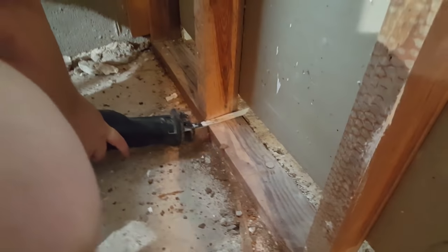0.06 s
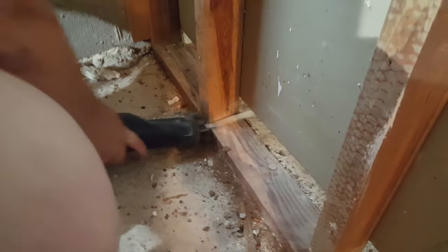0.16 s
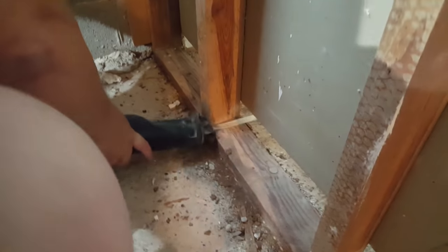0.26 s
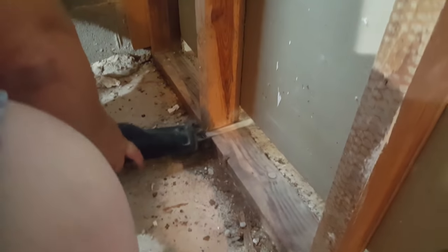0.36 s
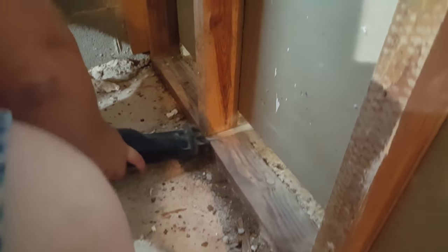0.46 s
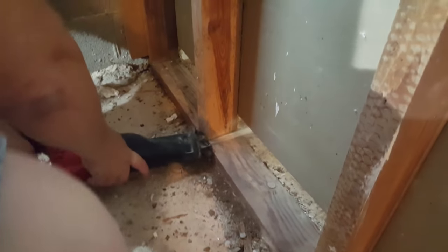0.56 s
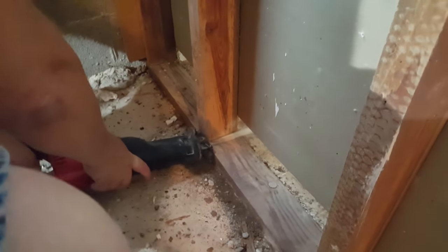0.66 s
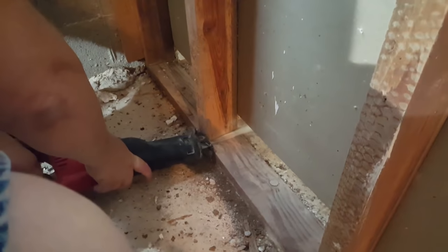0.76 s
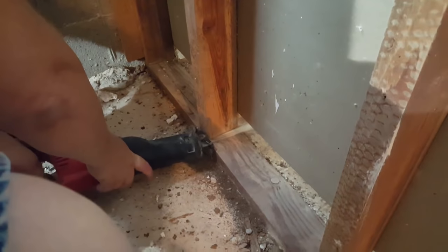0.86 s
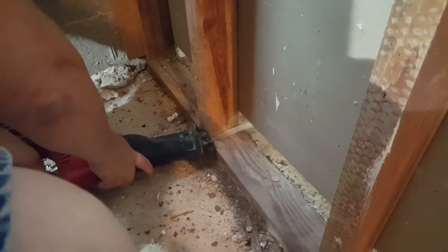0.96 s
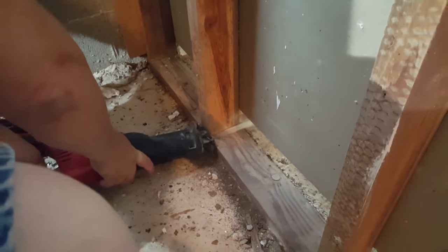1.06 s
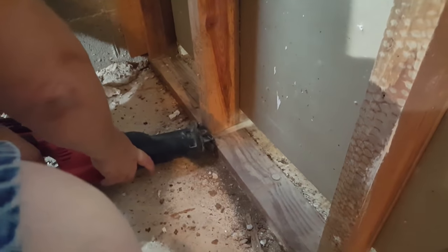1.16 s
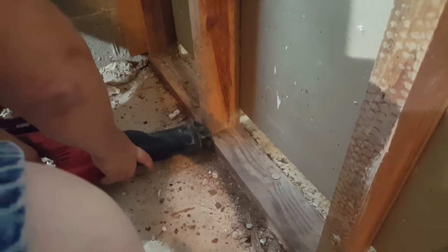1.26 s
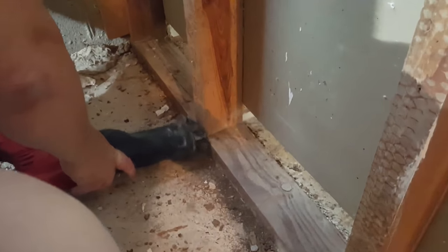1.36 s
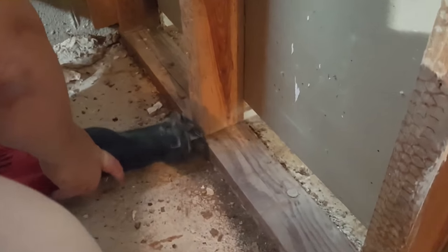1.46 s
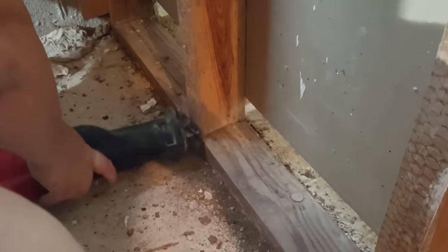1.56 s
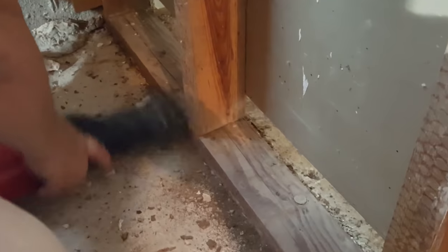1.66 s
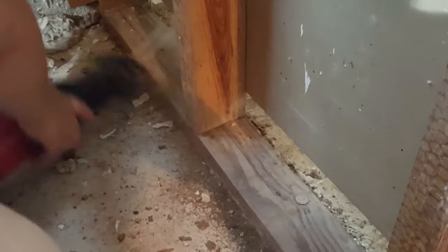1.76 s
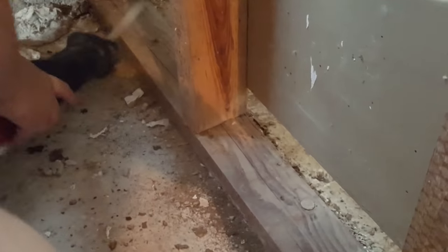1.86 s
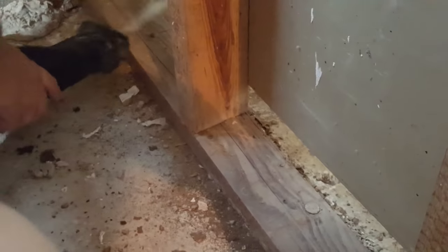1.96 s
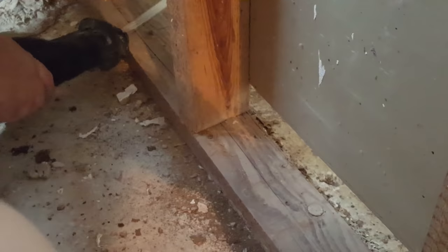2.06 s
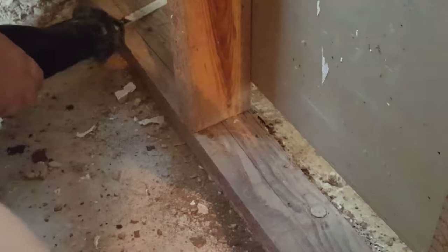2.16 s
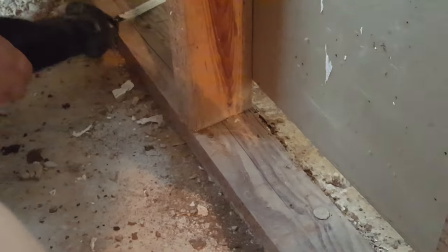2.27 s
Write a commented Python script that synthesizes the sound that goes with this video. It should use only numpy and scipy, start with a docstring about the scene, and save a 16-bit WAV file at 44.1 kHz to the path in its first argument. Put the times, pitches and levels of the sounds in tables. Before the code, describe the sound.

A reciprocating saw, close in a small bare room. Low handling rumble, a trigger snap at 0.08 seconds, then a short squeal as the motor starts near 0.2. A thumping kick at 0.29 opens a harsh rasp through nails, about 46 strokes a second, with cracks, wood shudder and singing chatter. At 1.84 the blade clinks free, whirs until 2.1, then brakes amid faint ticks.

```python
"""A low rumble of the tool being handled comes first, its trigger catch snaps, and squeals of filtered noise
lead the reciprocating saw up to about 46 strokes a second: gears and fan hiss through housing resonances.
For a second and a half the blade cuts nails: rasping tooth clicks, a slap a stroke, cracks, singing chatter
and thumps, while stroke harmonics shake the timber. It clinks free, runs on and is braked.
A small bare room answers throughout with a decaying noise tail."""
import sys
import numpy as np
from scipy import signal
from scipy.fft import rfft, irfft
from scipy.io import wavfile

SR = 44100
rng = np.random.default_rng(int(sys.argv[2]) if len(sys.argv) > 2 else 0)


def volts(x):
    """Linear amplitude factor 10**(x/20) for a level x in dB, scalar or array-like."""
    e = np.asarray(x, float) / 20
    return 10 ** e


def digitize_waveform(pressure):
    """Quantize a signal to 16-bit integers and store it at the path in sys.argv[1].

    Rows of a 2-D input are taken as channels; values are limited to [-1, 1].
    """
    field = np.atleast_2d(pressure).T
    bounded = np.clip(field, -1, 1)
    quanta = np.round(bounded * 32767).astype(np.int16)
    wavfile.write(sys.argv[1], SR, quanta)


N = 103635

# pace of the blade: (time [s], strokes per second [1/s])
STROKE_RATE = [(.2, 40), (.32, 45.5), (.45, 46.5), (1.3, 46.5), (1.5, 44.4), (1.75, 44.3), (1.95, 46.5),
               (2.35, 46.5)]
# the cut: (time [s], rasp [dB], slap depth [dB], odd strokes' extra slap [dB], share alike on every stroke [0-1])
CUT_COURSE = [(.2, -50, 6, 9, .1), (.25, -33.5, -6, 18, 0.4), (.29, -14, -5, -5, 0.37),
              (.33, -25.5, 6, 9.5, 0), (.42, -20.5, 10.5, 0, 0), (.6, -21.5, 6.5, 6.5, 0.06),
              (.75, -21.5, 9, 1.5, 0.01), (1.0, -23, 12.5, -1.5, .4), (1.25, -22, 13, -1.5, 0.25),
              (1.33, -26, 8, 3, 0.22), (1.5, -26, 8, 3, .25), (1.6, -22.5, 3, 3.5, 0.33),
              (1.7, -22.5, 0, 0, 0.06), (1.8, -30, 3, 3, 0.02), (1.84, -33, 1, 0, 0)]
# tone of the rasp: (frequency [Hz], relative density [dB per Hz])
CUT_TONE = [(35, -12), (60, -10.5), (180, -6), (308, -5.5), (458, -8), (553, -6.5), (636, -3.5), (698, -4),
            (1340, -4), (1860, -3), (2710, -21.5), (4120, -14.5), (10000, -34.5), (14900, -35),
            (16000, -92)]
# resonances of stud and blade: (frequency [Hz], width [Hz], relative level [dB])
STUD_MODES = [(638, 37, 0.5), (740, 34, 0.5), (945, 100, -1), (1032, 157, -2), (1248, 250, -3.5),
              (1438, 76, 1), (1583, 30, 0), (1820, 135, -9.5), (2087, 180, -1.5)]
# blade binds and chatters: (start [s], relative level [dB], length [s], start pitch [Hz], end pitch [Hz])
CHATTER_RUNS = [(.283, -13.5, .02, 1000, 854), (.358, -6.5, 0.014, 725, 687), (.405, -20, 0.011, 950, 1100),
                (.43, -13.5, 0.018, 757, 716), (.436, -16, 0.017, 1250, 1500),
                (.468, -12.5, .012, 1910, 1880), (.512, -19, 0.021, 1920, 1860),
                (.556, -13, .014, 980, 870), (.688, -11.5, .016, 1293, 1386), (.71, -10, 0.0082, 620, 620),
                (.728, -16, 0.023, 1653, 1600), (.795, -20, 0.015, 643, 790), (.925, -23, 0.011, 794, 930),
                (1.033, -18, .016, 745, 740), (1.068, -17, 0.024, 1394, 1700),
                (1.097, -13.5, 0.025, 734, 700), (1.203, -11, 0.023, 637, 620),
                (1.318, -10, .038, 1226, 1157), (1.33, -16.5, 0.044, 1615, 1810),
                (1.37, -11, 0.0258, 790, 1058), (1.417, -8.5, 0.02, 840, 1020),
                (1.461, -10, 0.031, 840, 990), (1.506, -12.5, .028, 1208, 1260),
                (1.508, -14, 0.019, 914, 930), (1.549, -12, 0.0456, 787, 657),
                (1.56, -19.5, 0.04, 1006, 1020), (1.596, -20, .025, 954, 900),
                (1.645, -18, 0.031, 1660, 1640), (1.69, -22.5, 0.02, 1740, 1710)]
# hardest blows of the blade on nail and wood: (time [s], relative peak [dB])
BLOW_HITS = [(0.288, -7.5), (0.4044, -20), (0.4262, -9), (0.4479, -18), (0.472, -15), (0.493, -12),
             (0.5147, -5.5), (0.557, -12.5), (0.5824, -12.5), (0.6399, -12.5), (0.6843, -12.5),
             (0.856, -12.5), (0.985, -11.5), (1.072, -13), (1.351, -9.5), (1.3915, -10), (1.553, -11.5),
             (1.598, -10.5), (1.8403, -12)]
# tone of the blows: (frequency [Hz], relative density [dB per Hz])
BLOW_TONE = [(180, -51), (300, -16), (1150, -15), (2650, -11), (4090, -13), (10200, -27.5), (13500, -49),
             (16000, -45)]
# tool kicks against the timber: (time [s], level [dB], frequency [Hz], t60 [s])
KICK_HITS = [(.286, -13, 240, .18), (.295, -10, 390, .12), (.29, -10, 170, .25), (.337, -9, 160, .11),
             (1.757, -13, 185, .08), (1.8389, -6, 850, .02)]
# timber shaken by the strokes: (time [s], level [dB])
SHAKE_LEVEL = [(.22, -74), (.32, -22), (.5, -30.5), (.7, -21), (1.0, -17.5), (1.25, -23), (1.4, -34),
               (1.6, -39), (1.78, -25), (1.86, -49), (2.1, -70)]
# harmonics of that shaking: (multiple of the stroke rate [1], relative level [dB])
SHAKE_HARMONICS = [(1, -5), (2, -5), (3, -6), (4, 0), (5, -4), (6, -4), (7, -10), (8, -7), (9, -2),
                   (10, -2), (11, -4), (12, -12), (13, -8), (14, -6), (15, -12), (16, -4)]
# running noise of gears and fan: (time [s], relative level [dB])
MOTOR_LEVEL = [(0, -50.5), (.19, -83), (.235, -26), (.26, -24), (.3, -23), (1.0, -23), (1.7, -26),
               (1.9, -24), (2.095, -25), (2.13, -35), (2.2, -52), (2.35, -60)]
# tone of gears and fan: (frequency [Hz], relative density [dB per Hz])
MOTOR_TONE = [(35, -72), (60, -43), (108, -32), (153, -18), (262, -9.5), (315, -10), (354, -5), (924, 1),
              (2900, -10.5), (4120, -7.5), (4640, -14.5), (8320, -16.5), (10300, -36), (12700, -25),
              (16000, -37)]
# housing resonances: (frequency [Hz], width [Hz], relative level [dB])
HOUSING_MODES = [(1020, 60, -14), (1375, 90, 13), (1790, 110, 28), (2540, 24, -50.5), (3030, 120, 16),
                 (4030, 290, 15), (4950, 38, -65)]
# squeals while the motor starts: (start [s], length [s], frequency [Hz], filter width [Hz], level [dB])
START_SQUEALS = [(0.118, .14, 7800, 9, -43), (.21, 0.091, 6100, 1300, -28), (0.251, 0.025, 1262, 110, -13)]
# rings after the trigger catch snaps: (frequency [Hz], level [dB], t60 [s])
TRIGGER_MODES = [(915, -29, 0.17), (1713, -33.5, 0.1), (540, -32, .06), (4950, -32.5, 0.044)]
# ticks of the tool and loose bits: (time [s], level [dB], t60 [s], treble over level [dB])
TICK_HITS = [(0.0814, -27.5, 0.11, -30), (0.111, -44, 0.054, -32), (.147, -41.5, .05, -3.5),
             (0.187, -34.5, 0.082, -18), (1.838, -22.5, 0.053, -3), (1.8548, -19, 0.035, -13),
             (1.91, -35, 0.035, 3), (2.09, -33.5, 0.051, 3.5), (2.204, -53, .04, -6), (2.243, -51, .04, -6),
             (2.287, -40, 0.031, -15)]
# tone of the duller part of the ticks: (frequency [Hz], relative density [dB per Hz])
TICK_TONE = [(180, -29), (300, -10), (701, -4.5), (946, -4), (3350, -21), (3700, -19), (4830, -18.5),
             (6100, -18.5), (8360, -24), (9390, -53), (10200, -45), (12300, -26), (16000, -117)]
# ringing of the freed blade: (frequency [Hz], relative level [dB], t60 before a cap [s])
BLADE_MODES = [(1870, 1, 0.11), (3130, -2, 0.21), (4250, 5.5, 0.02), (7830, 0.5, 0.071)]
# irregular thudding through floor and wall: (time [s], level before lumps [dB])
THUD_LEVEL = [(.2, -47), (.25, -27), (.3, -12.5), (.4, -21.5), (.52, -22.5), (.7, -25), (1.0, -53),
              (1.3, -24), (1.55, -24.5), (1.63, -22), (1.68, -22), (1.77, -28.5), (1.81, -34),
              (1.86, -29.5), (2.0, -44), (2.2, -43.5)]
# tone of the thudding: (frequency [Hz], relative density [dB per Hz])
THUD_TONE = [(15, -30), (25, -16.5), (102, 2), (172, 5), (216, 1.5), (270, -2.5), (479, -9), (600, -6),
             (780, -20.5), (1320, -120)]
# low rumble of the tool being handled before it starts, and of the room afterwards: (time [s], level [dB])
RUMBLE_LEVEL = [(0, -32.5), (.06, -32.5), (.13, -32.5), (.19, -34.5), (.3, -36), (2.0, -47), (2.2, -41),
                (2.35, -67)]
# tone of the rumble: (frequency [Hz], relative density [dB per Hz])
RUMBLE_TONE = [(15, -31), (35, -22), (86, -0.5), (129, 0.5), (205, -9.5), (248, -8), (277, -30), (500, -46),
               (650, -73), (1100, -120)]
# tone of the steady background hiss: (frequency [Hz], relative density [dB per Hz])
FLOOR_TONE = [(210, -41), (350, -4), (467, -12), (1260, -14), (2130, -19.5), (2710, -28), (3920, -28),
              (16000, -52)]
# stereo width of the coloured noises: (frequency [Hz], side minus mid [dB])
SIDE_WIDTH = [(60, -28), (150, -24.5), (380, -7), (950, -5), (2380, 0.5), (5980, -1), (15000, 1)]
# stereo placing: (time [s], left minus right [dB])
PAN_COURSE = [(0, 2), (.3, 1), (.5, 2), (1.0, 0.6), (1.6, 1), (2.35, 1)]
# difference between the microphones: (frequency [Hz], left minus right [dB])
MIC_BALANCE = [(60, 0.0), (150, -1.5), (380, -2), (950, -0.5), (2380, 0), (5980, -2), (15000, -4.5)]


def rms_one(x):
    """Scales a signal to rms 1."""
    return x / np.sqrt(np.mean(x ** 2) + 1e-20)


def in_time(rows):
    """Draws each table column as a curve in time."""
    s, *columns = np.transpose(rows)
    return [np.interp(np.arange(N) / SR, s, column) for column in columns]


def at_hz(points, hz):
    """Reads a spectrum table on a logarithmic frequency axis."""
    table_hz, table_db = np.array(points).T
    return np.interp(np.log(hz), np.log(table_hz), table_db)


def drift(rate_hz):
    """Slow random wander of rms about 1: noise through two equal low-pass poles."""
    every = 40  # samples between computed points
    r = np.exp(-2 * np.pi * rate_hz * every / SR)
    noise = rng.standard_normal(N // every + 2002)
    slow = signal.lfilter([1], [1, -2 * r, r * r], noise)[2000:]  # without the settling
    return np.interp(np.arange(N) / every, np.arange(len(slow)), rms_one(slow))


def colour(x, spectrum):
    """Minimum-phase filter for mid and side, of unit noise gain in mid; nothing sounds early."""
    hz = np.maximum(np.arange(4097) * SR / 8192, 10)
    db = at_hz(spectrum, hz) + np.array([0 * hz, at_hz(SIDE_WIDTH, hz)])
    # folding the cepstrum forward gives the minimum phase
    cepstrum = irfft(db * np.log(10) / 20)
    cepstrum[:, 1:4096] *= 2
    cepstrum[:, 4097:] = 0
    taps = irfft(np.exp(rfft(cepstrum)))
    return signal.fftconvolve(x, taps / np.sqrt(np.sum(taps[0] ** 2)), axes=1)[:, :N]


def resonate(x, hz, width_hz):
    """One two-pole resonance."""
    r = np.exp(-np.pi * width_hz / SR)
    feedback = [1, -2 * r * np.cos(2 * np.pi * hz / SR), r * r]
    return signal.lfilter([(1 - r * r) / 2, 0, (r * r - 1) / 2], feedback, x)


def bursts(rows):
    """Envelope of sudden bursts (time [s], level [dB], t60 [s]), each cut off once it has fallen 60 dB."""
    out = np.zeros(N)
    for s, db, t60 in rows:
        part = out[int(s * SR):int((s + t60) * SR)]
        part += volts(db - 60 * np.arange(len(part)) / SR / t60)
    return out


def grains(per_s, spread_db, size):
    """Random clicks of uneven size, signs unrelated in mid and side; rms 1."""
    struck = rng.random(size) < per_s / SR
    sizes = volts(spread_db * np.minimum(rng.exponential(1, size), 3)) * struck
    return rms_one(sizes) * rng.choice([-1, 1], (2, size))


def stud(x, weights):
    """Stud and blade resonances, each fed with its own weight in time and scaled for noise gain."""
    unit = np.sqrt(sum(volts(2 * db) * width for _, width, db in STUD_MODES) * np.pi / SR)
    out = 0
    for k, (hz, width, db) in enumerate(STUD_MODES):
        fed = x * weights(hz) + 1e-18  # never quite zero
        out = out + volts(db) * (-1) ** k * resonate(fed, hz, width)
    return out / unit * [[1], [.7]]


def strokes():
    """Running count of blade strokes, the sum of the stroke rate; zero at a slap."""
    slap_at_s = .4479
    turns = np.cumsum(in_time(STROKE_RATE)[0]) / SR
    return turns - turns[int(slap_at_s * SR)]


def cut(turns):
    """Dense tooth strikes, partly alike on every stroke, swelling at each end of the stroke."""
    teeth_per_s, tooth_spread_db = 3500, 3.5
    slap_decay_s, stroke_spread_db = .005, 2.5
    return_share, return_turn = .46, .45  # weaker slap as the blade turns back
    end_s = .033  # time constant of the dying cut
    stud_db, stud_shift_db = -9, 4.0  # the balance of the resonances shifts as the grip changes
    rasp_db, slap_db, alternate_db, repeat = in_time(CUT_COURSE)
    repeat = np.clip(repeat, 0, 1)
    t = np.arange(N) / SR
    on = (t > CUT_COURSE[0][0]) * np.exp(-np.maximum(t - CUT_COURSE[-1][0], 0) / end_s)

    decay = slap_decay_s * in_time(STROKE_RATE)[0]  # in strokes
    slap = np.exp(-(turns % 1) / decay)
    slap = slap + return_share * np.exp(-((turns - return_turn) % 1) / decay)
    which = np.floor(turns).astype(int)
    uneven = stroke_spread_db * np.clip(rng.standard_normal(200), -1.5, 1.5)[which + 50]
    uneven = uneven + alternate_db * np.where(which % 2 == 0, -1, 1)

    one_stroke = grains(teeth_per_s, tooth_spread_db, size=948)
    looped = one_stroke[:, (turns % 1 * 948).astype(int)]
    fresh = grains(teeth_per_s, tooth_spread_db, size=N)
    teeth = np.sqrt(1 - repeat) * fresh + np.sqrt(repeat) * looped
    teeth = teeth * on * volts(rasp_db + slap * (slap_db + uneven))
    ringing = stud(teeth, lambda hz: volts(stud_shift_db * drift(7.8)))
    return colour(teeth, CUT_TONE) + volts(stud_db) * ringing


def chatter():
    """The blade binds: runs of knocks excite the stud, and each run sings at a sliding pitch."""
    knocks_per_s, knock_spread_db = 1500, 2.0
    fall_db_per_octave = 4  # resonances away from the pitch are fed less
    sing_db, sing_waver, sing_flutter_db = -4, .02, 1.5

    def knock_level(hz):
        out = np.zeros(N)
        for s, db, length, start_hz, end_hz in CHATTER_RUNS:
            part = out[int(s * SR):int((s + length) * SR)]
            octaves = np.abs(np.log2(hz / np.geomspace(start_hz, end_hz, len(part))))
            fade = np.cos(np.linspace(0, np.pi / 2, len(part)))
            part += volts(db - fall_db_per_octave * octaves) * fade
        return out

    song = np.zeros((2, N))
    waver = 1 + sing_waver * drift(60)
    flutter = volts(sing_db + sing_flutter_db * drift(90))
    all_phases = rng.random((len(CHATTER_RUNS), 2, 1))
    for (s, db, length, start_hz, end_hz), phases in zip(CHATTER_RUNS, all_phases):
        span = slice(int(s * SR), int((s + length) * SR))
        u = np.linspace(0, 1, span.stop - span.start)
        cycles = np.cumsum(start_hz * (end_hz / start_hz) ** u * waver[span]) / SR
        swell = np.sqrt(np.abs(np.sin(np.pi * u)))
        song[:, span] += volts(db) * swell * np.sin(2 * np.pi * (cycles + phases))
    knocks = stud(grains(knocks_per_s, knock_spread_db, size=N), knock_level)
    return knocks + song * flutter * [[1], [.6]]


def blows():
    """Blade on nail and wood: short bright cracks of decaying coloured noise."""
    trim_db, t60_s = -7, .04
    envelope = bursts([(s, db + trim_db, t60_s) for s, db in BLOW_HITS])
    return colour(rng.standard_normal((2, N)) * envelope, BLOW_TONE)


def kicks():
    """The tool kicks the timber: decaying sines bloom within a cycle and sag in pitch."""
    rise_cycles, phase_lag = .8, .17  # lag: share of the phase lost by t60
    out = 0
    for s, db, hz, t60 in KICK_HITS:
        t = np.maximum(np.arange(N) / SR - s, 0)
        bloom = 1 - np.exp(-t * hz / rise_cycles)
        cycles = hz * t * (1 - phase_lag * np.minimum(t / t60, 1))
        out = out + bloom * volts(db - 60 * t / t60) * np.sin(2 * np.pi * cycles)
    return out


def shake(turns):
    """Timber shaken at multiples of the stroke rate, each wavering in level and phase."""
    waver_db, waver_rad = 2.0, .6
    lines = 0
    for multiple, db in SHAKE_HARMONICS:
        level = volts(db + waver_db * drift(6.6))
        phase = 2 * np.pi * (round(multiple) * turns + rng.random()) + waver_rad * drift(3.8)
        lines = lines + level * np.sin(phase)
    return volts(in_time(SHAKE_LEVEL)[0]) * rms_one(lines)


def motor(turns):
    """Gear and fan noise with housing resonances, throbbing once a stroke."""
    throb_db, rings_db = 1.5, -15
    noise = rng.standard_normal((2, N))
    rings = sum(volts(db) * rms_one(resonate(noise, hz, width)) for hz, width, db in HOUSING_MODES)
    body = colour(noise, MOTOR_TONE) + volts(rings_db) * rms_one(rings) * [[1], [.7]]
    return volts(in_time(MOTOR_LEVEL)[0] + throb_db * np.cos(2 * np.pi * turns)) * body


def start_tones():
    """Brief squeals, noise through two equal resonances each, that swell and then stop."""
    t, out = np.arange(N) / SR, 0
    for s, length, hz, width_hz, db in START_SQUEALS:
        u = np.clip((t - s) / length, 0, 1)
        swell = u * np.sqrt(np.sqrt(1 - u ** 2))
        squeal = resonate(resonate(rng.standard_normal((2, N)), hz, width_hz), hz, width_hz)
        squeal = squeal / np.std(squeal[:, (u > 0) & (u < 1)])
        out = out + volts(db) * swell * squeal * [[1], [.7]]
    return out


def trigger():
    """The trigger catch snaps and the housing rings briefly in decaying sines."""
    snap_s = .0818
    t = np.arange(N) / SR - snap_s
    rings = sum(bursts([(snap_s, db, t60)]) * np.sin(2 * np.pi * hz * t) for hz, db, t60 in TRIGGER_MODES)
    return rings * [[1], [.4]]


def ticks():
    """Noise puffs of rattle, duller or brighter, and one clink of the freed blade in decaying sines."""
    treble_hz, clink_s, clink_db, longest_t60_s = 3000, 1.839, -20, .04
    noise, t = rng.standard_normal((2, 2, N)), np.arange(N) / SR
    dull = noise[0] * bursts([(s, db, t60) for s, db, t60, _ in TICK_HITS])
    bright = noise[1] * bursts([(s, db + up_db, t60) for s, db, t60, up_db in TICK_HITS])
    bright = signal.lfilter(*signal.butter(2, treble_hz, "high", fs=SR), bright)
    out = colour(dull, TICK_TONE) + bright
    for hz, db, t60 in BLADE_MODES:
        envelope = bursts([(clink_s, clink_db + db, min(t60, longest_t60_s))])
        out += envelope * np.sin(2 * np.pi * (hz * t + rng.random((2, 1)))) * [[1], [.6]]
    return out


def thud():
    """Irregular low noise through floor and wall, its level lumpy."""
    level_db = in_time(THUD_LEVEL)[0] + 2.0 * drift(30)
    return volts(level_db) * colour(rng.standard_normal((2, N)), THUD_TONE)


def rumble():
    """Low coloured noise of the tool being handled before it starts, and of the room afterwards."""
    return volts(in_time(RUMBLE_LEVEL)[0]) * colour(rng.standard_normal((2, N)), RUMBLE_TONE)


def room(x):
    """Small bare room: a diffuse noise tail, duller as it dies."""
    t60_s, level_db, dull_hz, gap_s = .49, -14.5, 2240, .006
    t = np.arange(int(t60_s * SR)) / SR
    noise = rng.standard_normal((2, len(t)))
    dull = signal.lfilter(*signal.butter(1, dull_hz, fs=SR), noise)
    tail = dull * volts(-60 * t / t60_s) + noise * .5 * volts(-100 * t / t60_s)  # the full band dies faster
    tail = tail * (t > gap_s)
    return volts(level_db) * signal.fftconvolve(x, tail / np.sqrt(np.sum(tail[0] ** 2)), axes=1)[:, :N]


def background():
    """Steady coloured hiss under everything."""
    level_db = -50.5
    return volts(level_db) * colour(rng.standard_normal((2, N)), FLOOR_TONE)


def scene():
    """Mixes the layers in mid and side, then places them left and right."""
    turns = strokes()
    tool = cut(turns) + chatter() + blows() + motor(turns) + start_tones() + trigger() + ticks()
    timber = (shake(turns) + kicks()) * [[1], [.12]]
    mid, side = tool + room(tool) + timber + thud() + rumble() + background()
    pan_db, = in_time(PAN_COURSE)
    return np.array([(mid + side) * volts(pan_db / 2), (mid - side) * volts(-pan_db / 2)])


def band_limit(x):
    """A steep low-pass at the top of the band."""
    return signal.sosfilt(signal.butter(12, 16000, fs=SR, output="sos"), x)


def record(dry):
    """Two microphones of unlike colour, with peaks rounded by a tanh curve."""
    ceiling = 1.25
    hz = np.maximum(np.arange(N // 2 + 1) * SR / N, 10)
    half_db = at_hz(MIC_BALANCE, hz) / 2
    heard = irfft(rfft(dry) * volts(half_db * np.array([[1], [-1]])), N)
    mix = ceiling * np.tanh(heard / ceiling)
    return band_limit(mix)


dry = scene()
out = record(dry)
digitize_waveform(out)
```